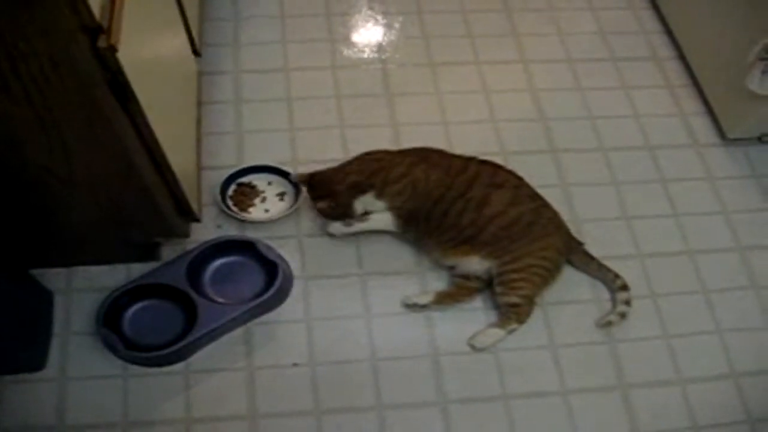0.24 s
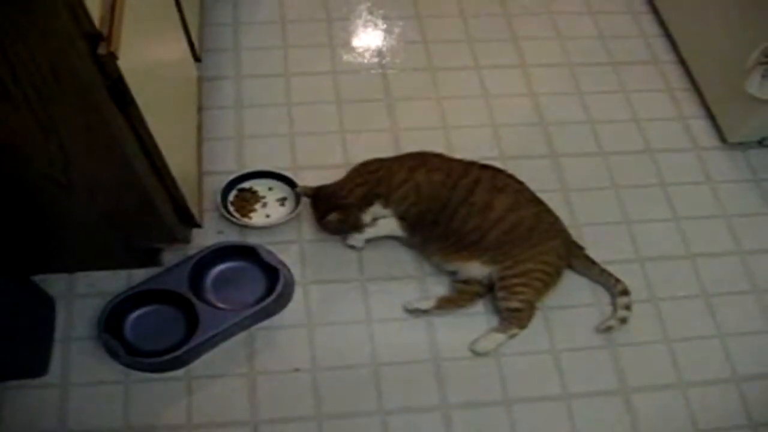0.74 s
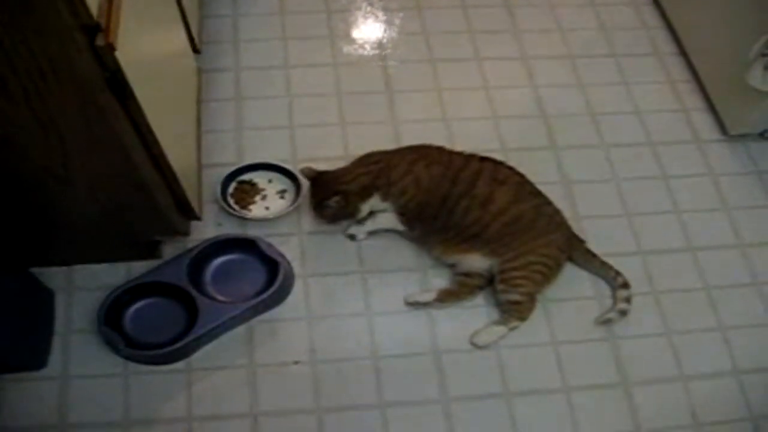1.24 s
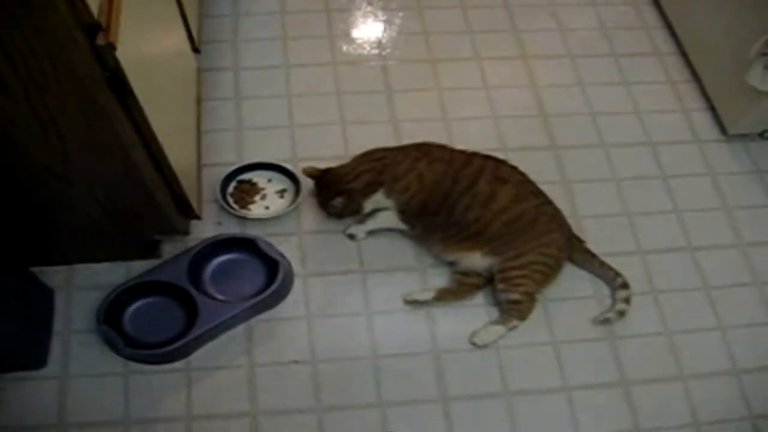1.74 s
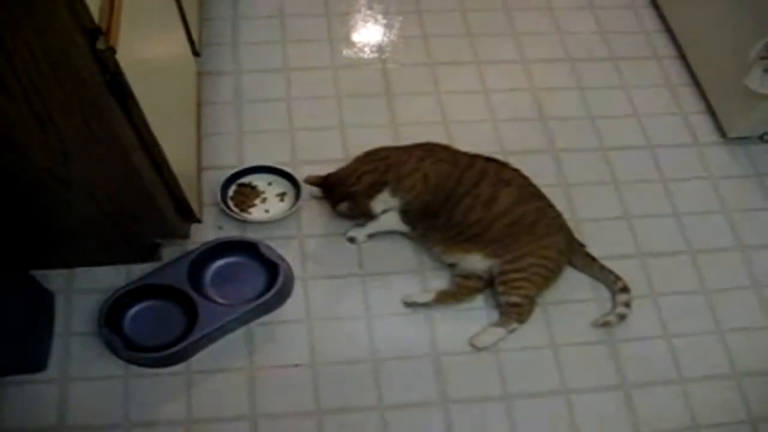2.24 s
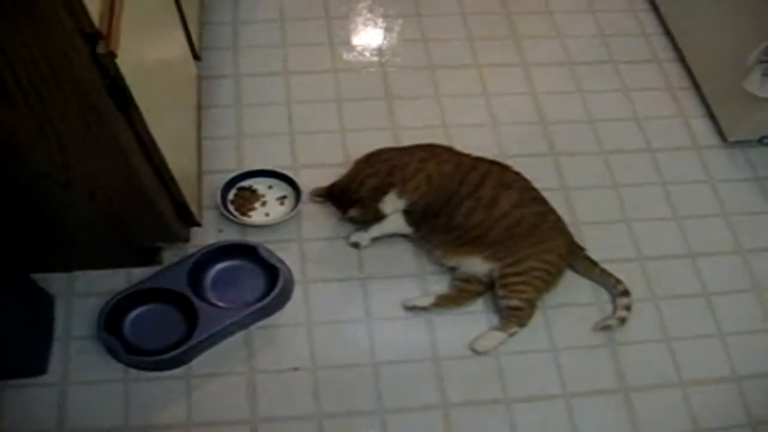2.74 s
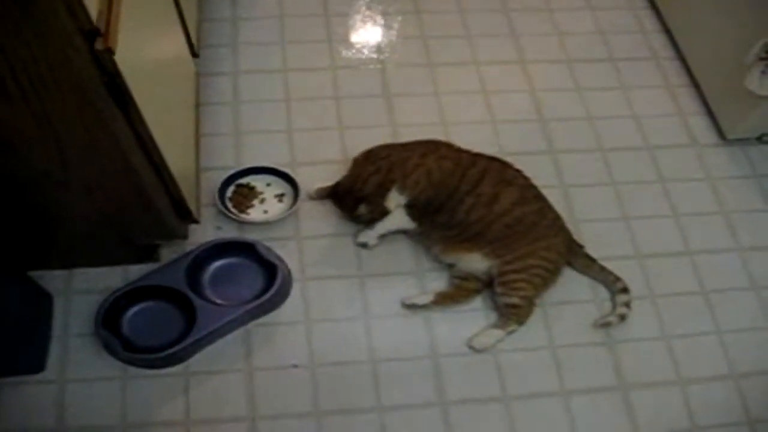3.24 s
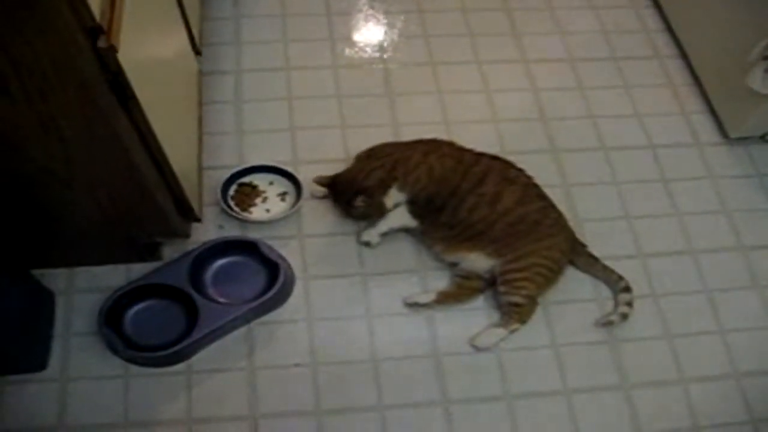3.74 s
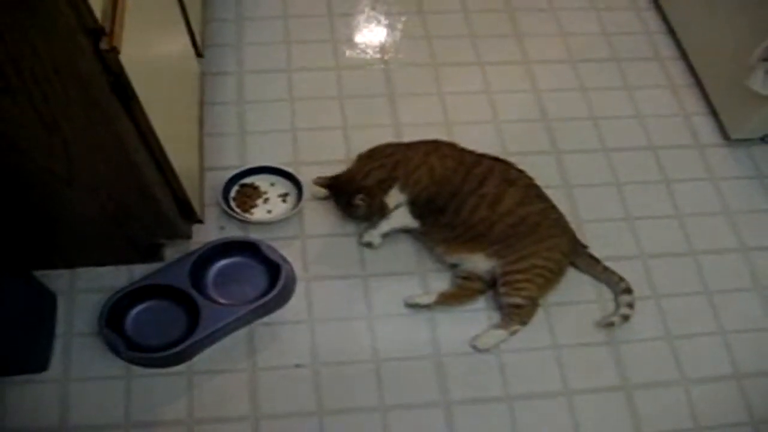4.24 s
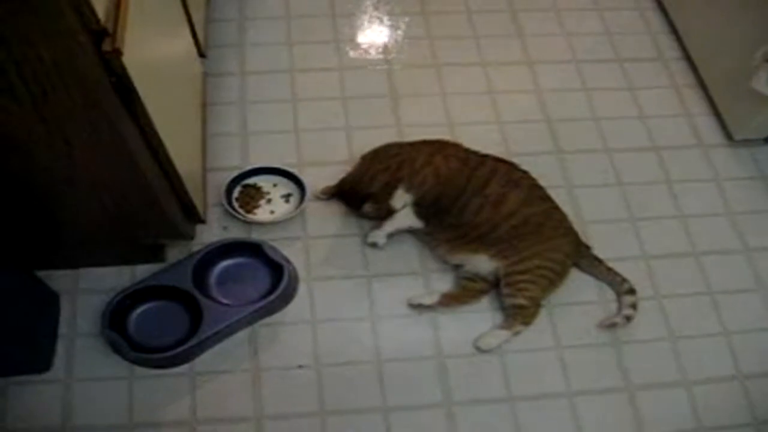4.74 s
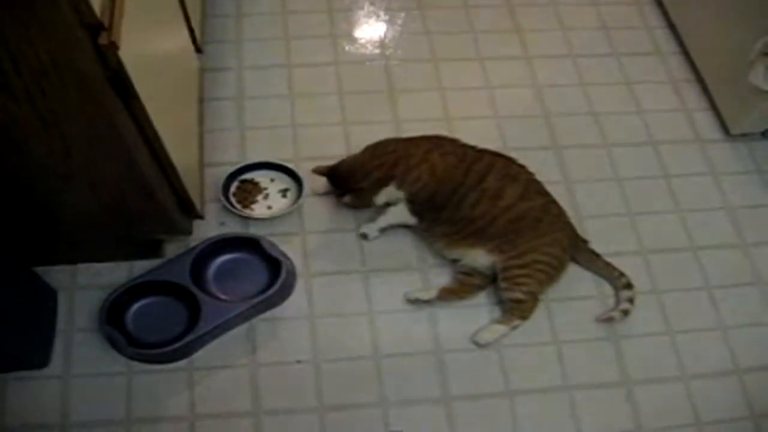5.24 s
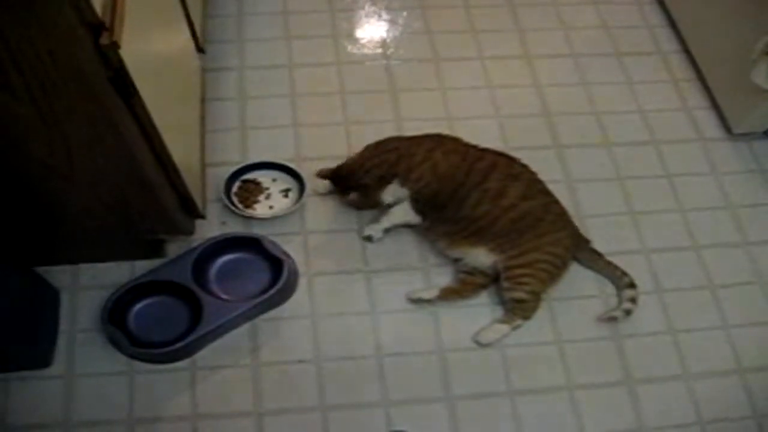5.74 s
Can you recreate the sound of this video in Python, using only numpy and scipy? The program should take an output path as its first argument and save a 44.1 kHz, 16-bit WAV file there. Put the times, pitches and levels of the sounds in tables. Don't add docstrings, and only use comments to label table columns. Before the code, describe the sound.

Low motor drone with slow beating, muffled knocks and soft fan air fills a small tiled kitchen. Three crisp little pellet crunches come around two seconds, then a fainter one and a last soft crumble near the end. The sound is muffled and lo-fi, with a slightly flickering top and regular short dropouts to silence.

```python
import sys
import numpy as np
from scipy import signal
from scipy.fft import rfft, irfft, next_fast_len
from scipy.io import wavfile
from scipy.ndimage import uniform_filter1d

SR = 44100
rng = np.random.default_rng(int(sys.argv[2]) if len(sys.argv) > 2 else 0)


def volts_from_db(level):
    exponent = np.asarray(level, float) / 20
    return 10 ** exponent


def int16_out(signal):
    q = np.round(np.clip(np.atleast_2d(signal).T, -1, 1) * 32767)
    wavfile.write(sys.argv[1], SR, q.astype(np.int16))


N = 263718

MOTOR_HZ = 130.575


def motor():
    # (multiple of motor tone, level/dB, wobble/dB)
    overtones = [(.456, -55.5, 4), (0.483, -48.5, -0.5), (.63, -56, 5.5), (2, -41.5, 1.5), (3, -40.5, 1),
                 (4, -48.5, 1)]
    # (f/Hz, level/dB)
    whines = [(1045, -58), (1175, -58), (1307, -60), (1697, -61), (1984, -60)]
    t_s = kitchen_time(np.arange(N) / SR)
    turn_rad = 2 * np.pi * MOTOR_HZ * t_s
    jitter_rad = 0.11 * walk(18.0)
    out = np.imag(beating(t_s) * np.exp(1j * (turn_rad + jitter_rad)))
    for multiple, level_db, wobble_db in overtones:
        drift_rad = 2 * np.pi * rng.random() + 0.02 * multiple * walk(11.0)
        level = volts_from_db(level_db + wobble_db * walk(9))
        out += level * np.sin(multiple * turn_rad + drift_rad)
    for hz, level_db in whines:
        level = volts_from_db(level_db + 3 * walk(14))
        out += level * np.sin(2 * np.pi * hz * t_s + 0.7 * walk(14))
    return np.sqrt(2) * out


def beating(t_s):
    # (t/s, depth/dB, level of the swell that follows/dB)
    sags = [(.335, -12.5, -25), (.795, -10, -24.5), (1.3, -12.5, -26), (1.9, -3, -25), (2.342, -7, -25.5),
            (2.826, -2.5, -25), (3.395, -10, -25), (3.87, -8, -25.5), (4.28, -14, -26), (4.862, -12, -26),
            (5.362, -8, -25.5), (5.978, -13.5, -26.5)]
    beat_s, first_swell_db = 0.54, -26
    hurry = 0.31
    s, depth_db, swell_db = np.array(sags).T
    sag_s = np.r_[kitchen_time(s[0]) - beat_s, kitchen_time(s)]
    weak_share = (1 - volts_from_db(depth_db)) / (1 + volts_from_db(depth_db))
    share = np.interp(t_s, sag_s[1:], weak_share)
    angle = np.interp(t_s, sag_s, np.pi * (1 + 2 * np.arange(len(sag_s))))
    angle = angle - hurry * np.sin(angle)
    middle_s = sag_s + np.r_[np.diff(sag_s), beat_s] / 2
    level = volts_from_db(np.interp(t_s, middle_s, np.r_[first_swell_db, swell_db]))
    return level * (1 + share * np.exp(1j * angle)) / (1 + share)


def cabinet():
    # (f/Hz, width/Hz, level/dB)
    body_modes = [(172, 7.6, -2), (202.8, 18, 1.5), (203.4, 20, 0), (233.8, 21, -6)]
    door_modes = [(262.7, 48, 1), (290, 11, -3.5), (306, 17, 0.5), (330.8, 14, 1.5), (358.4, 22, 0.5)]
    panel_modes = [(440, 25, -1), (517.8, 19, -0.5), (550, 27, 2.5), (633.5, 60, 1.5), (707.4, 56, -4.5),
                   (775, 50, -8)]
    out = 0
    for push_db, modes in zip(pushes(), (body_modes, door_modes, panel_modes)):
        shake = ringing(rng.standard_normal(N), modes)
        power = uniform_filter1d(shake ** 2, size=2200)
        out = out + volts_from_db(push_db - 1.5) * shake / (0.15 + power) ** 0.4
    return out


def pushes():
    # (t/s, cabinet knock/dB, door/dB, panel rattle/dB)
    bumps = [(0.041, -27.5, -41, -38), (0.365, -35, -33.5, -36), (0.621, -22, -35.5, -34),
             (.805, -31, -35.5, -39), (.875, -34, -38.5, -43.5), (1.1, -30.5, -36, -42),
             (1.294, -32.5, -34.5, -33.5), (1.67, -42, -37, -42), (1.875, -37, -32.5, -35),
             (2.09, -42, -35.5, -40.5), (2.35, -37, -33, -31.5), (2.589, -35, -40.5, -38),
             (2.802, -30.5, -34, -35), (3.17, -32, -37, -40), (3.378, -32.5, -34.5, -33.5),
             (3.62, -32, -47, -47), (3.86, -33, -33, -34), (4.1, -32, -36, -37), (4.425, -33, -32.5, -34.5),
             (4.68, -32, -33.5, -38), (4.897, -32, -32, -36), (5.15, -29.5, -36, -46),
             (5.36, -33.5, -37, -36), (5.61, -30.5, -41, -43.5), (5.94, -28.5, -50, -38.5)]
    lags_s = [0., .015, .002]
    rumbles_db = [-42, -41.5, -49.5]
    rise_s, fall_s = 0.027, 0.029
    step = 64
    t_s = kitchen_time(np.arange(0, N + step, step) / SR)
    s, *peaks = np.array(bumps).T
    out = []
    for peak_db, lag_s, rumble_db in zip(peaks, lags_s, rumbles_db):
        late_s = t_s[:, None] - kitchen_time(s) - lag_s
        swell = np.exp(-(late_s / np.where(late_s < 0, rise_s, fall_s)) ** 2)
        level_db = 10 * np.log10(volts_from_db(2 * rumble_db) + swell @ volts_from_db(2 * peak_db))
        out.append(np.interp(np.arange(N) / step, np.arange(len(t_s)), level_db))
    return out


def cracks():
    # (t/s, peak/dB, snap f/Hz, floor part/dB, splinter part/dB)
    pellets = [(1.7005, -24.5, 3780, -11, -26), (1.7045, -32, 2200, 1.5, -30), (1.7095, -40, 4500, -5, -30),
               (2.0242, -21.5, 3960, -6, -10.5), (2.0284, -29, 2200, 4, -11),
               (2.0354, -29, 4300, -0.5, -20.5), (2.3527, -30.5, 2980, -8, -34.5),
               (2.362, -34, 2400, 5, -37), (3.629, -37, 3500, 0, -24), (5.185, -37, 2580, -6, -31),
               (5.2, -37.5, 2870, -10, -32), (5.214, -38, 2380, -6, -33), (.04, -39, 4500, -19.5, -16.5)]
    # (f/Hz, width/Hz, level/dB)
    floor_modes = [(800, 110, 1), (1100, 200, 0), (1950, 400, -2)]
    # (f/Hz, width/Hz, level/dB)
    splinter_modes = [(5900, 700, 0)]
    room_t60_s, room_db = 0.2, -5
    out = np.zeros(N + SR)
    t_s = np.arange(SR // 5) / SR
    for s, peak_db, snap_hz, floor_db, splinter_db in pellets:
        decay = np.exp(-t_s / 0.0015) + 0.25 * np.exp(-t_s / 0.012)
        burst = rng.standard_normal(len(t_s)) * decay
        burst[0] += 3.0
        hit = unit_peak(ringing(burst, [(snap_hz, 1600, 0)]))
        hit = hit + volts_from_db(floor_db) * unit_peak(ringing(burst, floor_modes))
        hit = hit + volts_from_db(splinter_db) * unit_peak(ringing(burst, splinter_modes))
        start = int(s * SR)
        out[start:start + len(t_s)] += volts_from_db(peak_db) * hit
    out = signal.sosfilt(signal.butter(6, 5800, fs=SR, output="sos"), out)
    room = rng.standard_normal(len(t_s)) * volts_from_db(-60 * t_s / room_t60_s)
    tail = signal.fftconvolve(out, room / np.linalg.norm(room))
    return out[:N] + volts_from_db(room_db) * tail[:N]


def fan():
    # (f/Hz, level per Hz/dB)
    hiss = [(20, -6), (55, -17), (100, -14.5), (136, -9), (177, -15.5), (255, -11.5), (341, -16.5),
            (468, -22), (850, -26.5), (1460, -29.5), (3900, -34), (6050, -42), (6800, -54), (8200, -75.5)]
    # (f/Hz, width/Hz, level/dB)
    housing_modes = [(691, 16, -2), (712, 16, -2), (800, 25, -3), (910, 18, -1), (955, 18, -2),
                     (1003, 25, -1), (1085, 40, -3), (1150, 30, -3), (1209, 16, 1), (1300, 25, -5),
                     (1342, 18, -3), (1453, 25, -6), (1582, 20, -4), (1650, 30, -7), (1745, 25, -7),
                     (1825, 28, -3), (1945, 25, -6), (1990, 36, -5), (2090, 50, -5), (2600, 50, -7),
                     (2740, 50, -7), (4000, 300, -10)]
    hiss_db, housing_db = -38, -45.0
    size = next_fast_len(N)
    hz = np.fft.rfftfreq(size, 1 / SR)[1:]
    hiss_hz, density_db = np.array(hiss).T
    colour = volts_from_db(np.interp(np.log(hz), np.log(hiss_hz), density_db))
    air = 0
    swell = walk(3.4)
    for mid_hz in 20 * 2 ** np.arange(0, 9.1, 0.5):
        band = np.exp(-0.5 * (np.log2(hz / mid_hz) / 0.21) ** 2)
        spectrum = rfft(rng.standard_normal(size)) * np.r_[0, colour * band]
        noise = irfft(spectrum, size)[:N]
        air = air + noise * volts_from_db(0.52 * swell + 1.2 * walk(12))
    pulse = 1 + 0.12 * np.sin(2 * np.pi * MOTOR_HZ * np.arange(N) / SR)
    housing = ringing(rng.standard_normal(N), housing_modes)
    return pulse * (volts_from_db(hiss_db) * unit(air) + volts_from_db(housing_db) * housing)


def ringing(x, modes):
    out = 0
    for hz, width_hz, db in modes:
        b, a = signal.iirpeak(hz, hz / (1.5 * width_hz), fs=SR)
        twice = signal.lfilter(b, a, signal.lfilter(b, a, x))
        out = out + volts_from_db(db) * unit(twice)
    return unit(out)


def walk(rate_hz):
    hold = int(SR / rate_hz)
    steps = np.repeat(rng.standard_normal(N // 200), hold)[:N]
    return 1.3 * uniform_filter1d(uniform_filter1d(steps, hold), hold)


def unit(x):
    return x / np.sqrt(np.mean(x ** 2))


def unit_peak(x):
    return x / np.abs(x).max()


def running():
    start, length, every = 5153, 4992, 61440
    return (np.arange(N) - start) % every >= length


def kitchen_time(s):
    return np.interp(s, np.arange(N) / SR, np.cumsum(running()) / SR)


def scene():
    return (motor() + cabinet() + fan() + cracks())[None]


def low_pass(x):
    return signal.sosfilt(signal.butter(12, 15900, fs=SR, output="sos"), x)


def record(dry):
    # (t/s, length/s, depth in bands: 1 or 2)
    dropouts = [(.55, .18, 1), (.8, .035, 2), (1.02, .155, 1), (1.681, .015, 2), (1.83, .035, 2),
                (2.13, .035, 1), (2.194, .034, 1), (2.3, .04, 1), (2.52, .09, 1), (2.654, .06, 1),
                (2.771, .032, 1), (3.075, .1, 1), (3.542, .057, 1), (3.63, .05, 1), (3.99, .075, 1),
                (3.991, .016, 2), (4.033, .014, 2), (4.1, .055, 1), (4.64, .12, 1), (5.08, .13, 1),
                (5.6, .06, 1), (5.821, .03, 1), (5.905, .03, 1)]
    frame, offset = 576, -0.01457
    depth = np.zeros(N)
    for s, length_s, bands in dropouts:
        span = slice(int(s * SR), int((s + length_s) * SR))
        depth[span] = np.maximum(depth[span], bands)
    below = []
    for edge_hz in (5650, 6200, 6800, 7900):
        lowpass = signal.ellip(10, 0.1, 70, edge_hz, fs=SR, output="sos")
        below.append(signal.sosfiltfilt(lowpass, dry))
    top_power = uniform_filter1d((below[3] - below[2]) ** 2, frame)
    crack = top_power > 6 * np.median(top_power)
    out = below[0]
    for low, high, sent in zip(below, below[1:], (depth < 2, depth < 1, crack)):
        out = out + (high - low) * uniform_filter1d(1.0 * sent, frame // 2)
    return low_pass((out + offset) * running())


dry = scene()
out = record(dry)
int16_out(out)
```